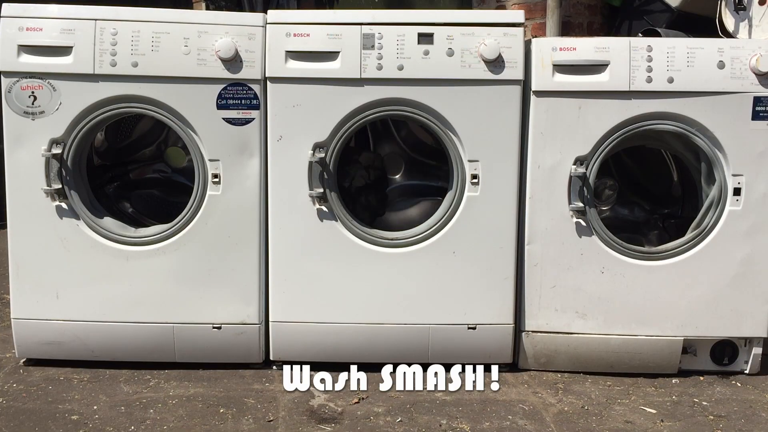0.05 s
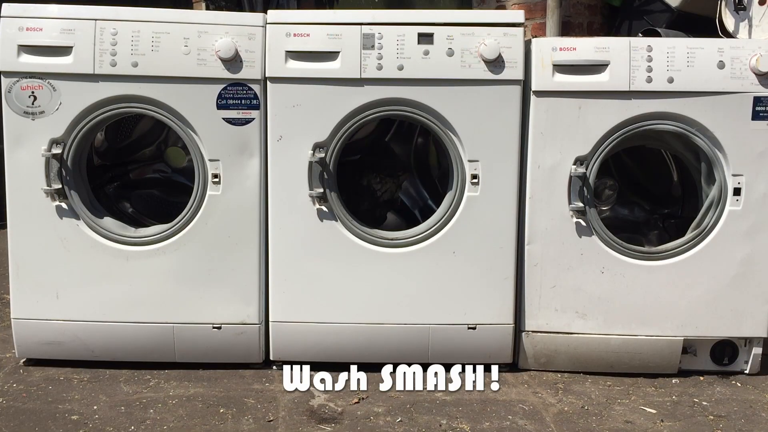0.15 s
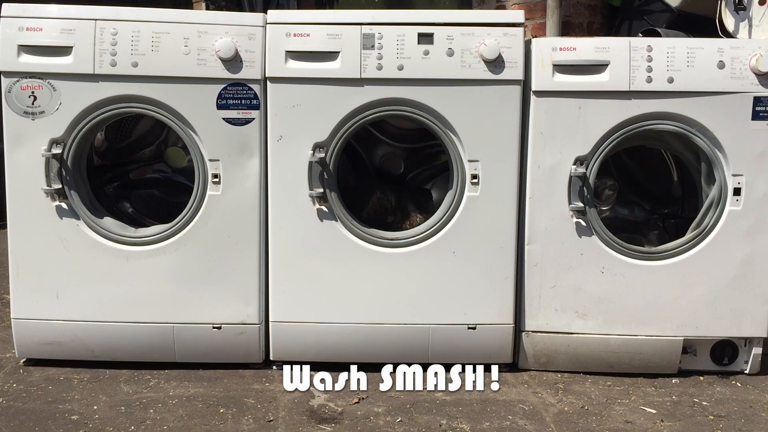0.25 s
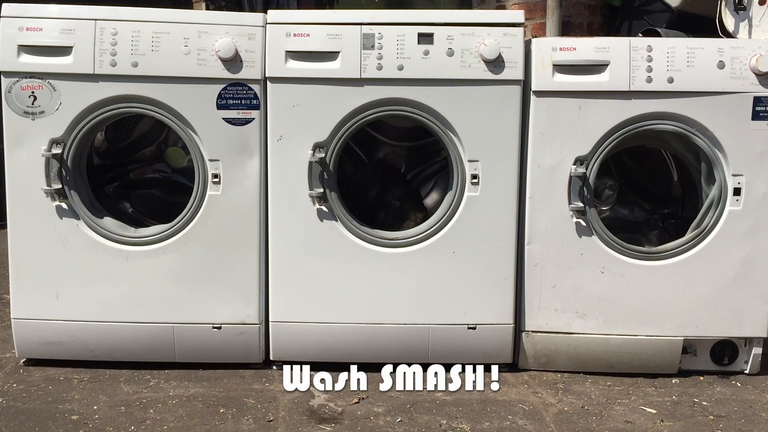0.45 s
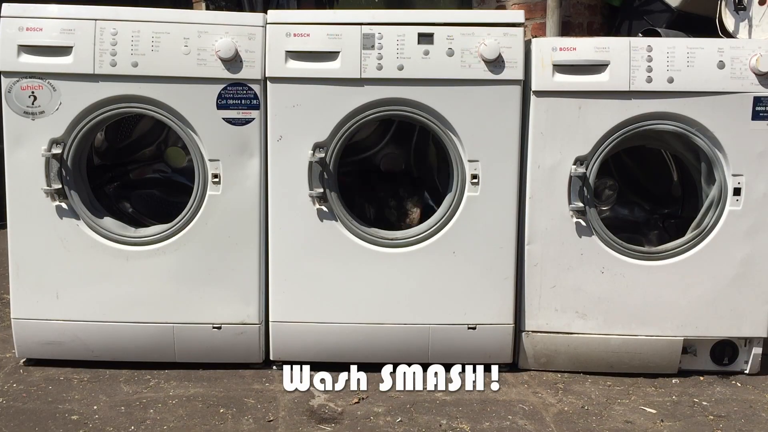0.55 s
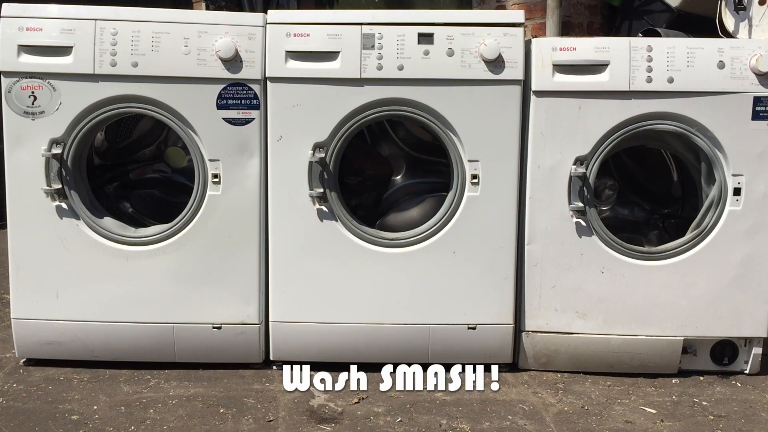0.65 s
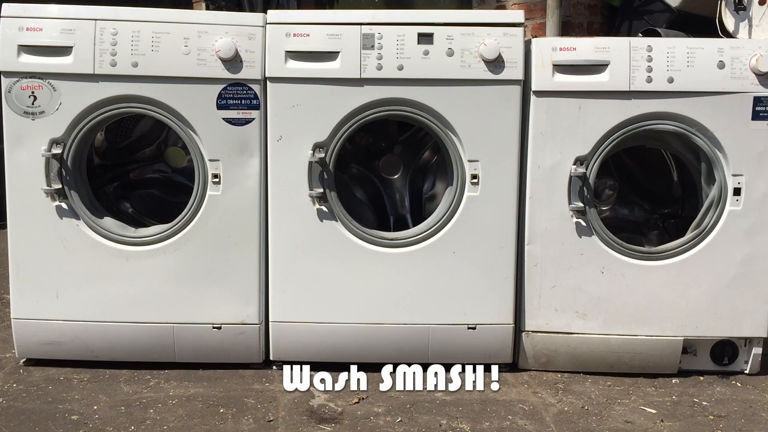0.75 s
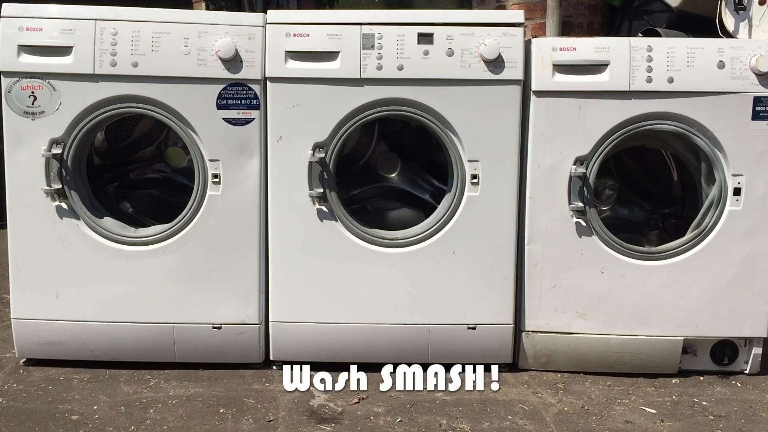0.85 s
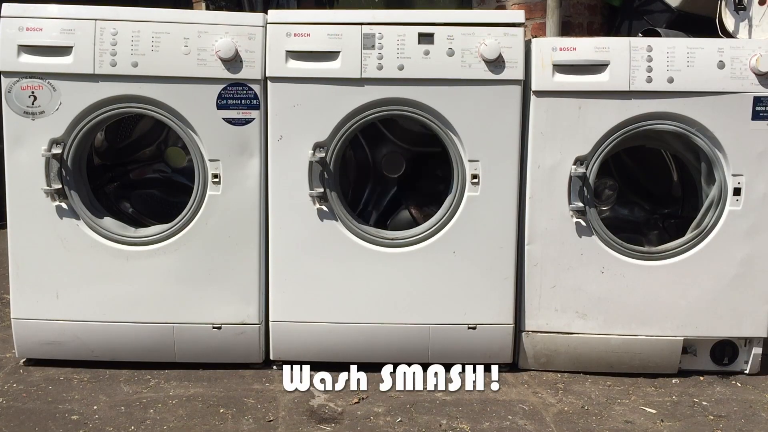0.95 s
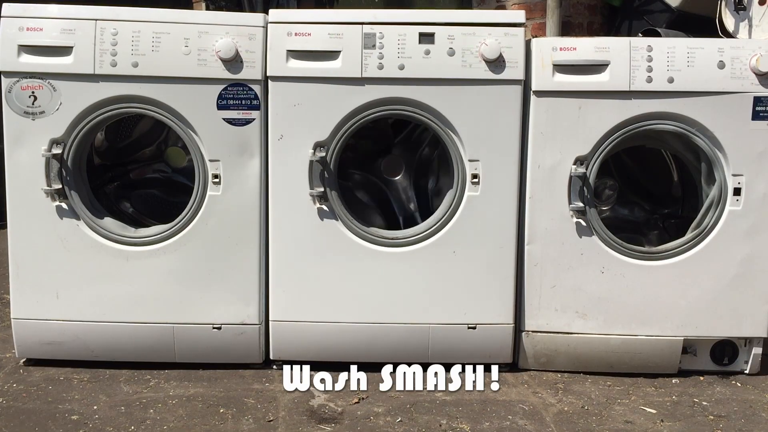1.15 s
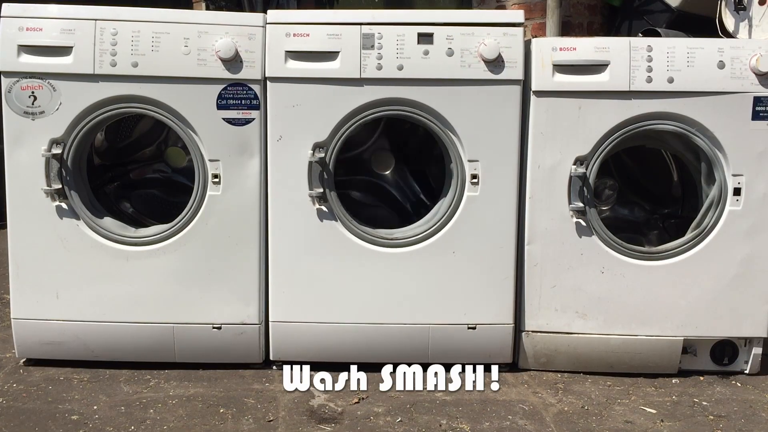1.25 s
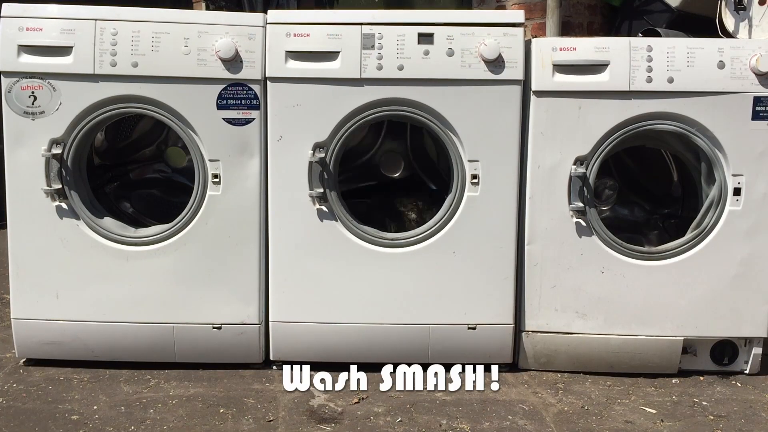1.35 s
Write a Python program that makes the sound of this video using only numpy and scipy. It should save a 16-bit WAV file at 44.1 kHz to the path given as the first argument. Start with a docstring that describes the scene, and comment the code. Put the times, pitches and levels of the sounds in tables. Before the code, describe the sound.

A washing machine drum tumbles a heavy load with thuds and metal clangs over motor hum.

```python
"""Heavy load in a washing machine

A load tumbles in the turning drum, outdoors and close by. Each blow excites damped modes:
the tub thumps, the cabinet knocks and shudders, the steel drum clangs and the contact crunches.
Underneath, the motor hums and whines and the drum rubs as it turns."""
import sys
import numpy as np
from scipy import signal
from scipy.fft import rfft, irfft, next_fast_len
from scipy.io import wavfile
from scipy.ndimage import uniform_filter1d

SR = 44100
rng = np.random.default_rng(int(sys.argv[2]) if len(sys.argv) > 2 else 0)


def dump_mix(stems):
    """Bounce the given channels to the path in sys.argv[1] as a 16-bit WAV at rate SR."""
    frames = np.atleast_2d(stems).T  # one column per channel
    limited = np.clip(frames, -1, 1)  # hard clip at full scale
    pcm = np.round(limited * 32767).astype(np.int16)
    wavfile.write(sys.argv[1], SR, pcm)


N = 61739
TIME = np.arange(N) / SR


def undb(db):
    """Amplitude ratio of a level in decibels."""
    return 10 ** (np.asarray(db) / 20)

def unit(x):
    """Normalisation to rms 1."""
    return x / np.sqrt(np.mean(x ** 2))

def response(x, blow_s=0.019):
    """Normalisation to the energy of rms 1 held for blow_s."""
    return x * np.sqrt(blow_s * SR / np.sum(x ** 2))

def at(points, hz):
    """Interpolation on a log-frequency axis."""
    f, v = np.array(points, float).T
    return np.interp(np.log(np.maximum(hz, 1)), np.log(f), v)

def colour(x, points):
    """Minimum-phase filtering by a curve of (frequency [Hz], gain [dB])."""
    size = 2 * next_fast_len(N)
    cepstrum = irfft(np.log(undb(at(points, np.fft.rfftfreq(size, 1 / SR)))))
    cepstrum[1:size // 2] *= 2
    cepstrum[size // 2 + 1:] = 0
    return irfft(rfft(x, size) * np.exp(rfft(cepstrum)))[:N]

def drift(rate_hz):
    """Smoothed random steps at rms 1."""
    hold = int(SR / rate_hz)
    steps = np.repeat(rng.standard_normal(400)[:N // hold + 1], hold)
    return unit(uniform_filter1d(uniform_filter1d(steps, hold), hold)[:N])

def fade(t60):
    """Exponential decay by 60 dB in t60 seconds."""
    return np.exp(-np.log(1000) * TIME / t60)

def modes(table):
    """Modal superposition: an impulse response is a sum of damped sinusoids."""
    return response(sum(undb(db) * fade(t60) * np.cos(2 * np.pi * hz * TIME) for hz, db, t60 in table))

def dense_ring(spectrum, t60):
    """Modal overlap: crowded resonances merge into decaying noise."""
    return response(colour(rng.standard_normal(N) * fade(t60), spectrum))

def ring(force, body):
    """Linear response: force convolved with a body's impulse response."""
    return signal.fftconvolve(force, body)[:N]

def tones(table, speed=1):
    """Frequency modulation: each tone wavers about a pitch proportional to speed."""
    out = 0
    for hz, db, waver in table:
        pitch = hz * speed * (1 + waver * drift(55))
        out = out + undb(db) * np.sqrt(2) * np.sin(2 * np.pi * np.cumsum(pitch) / SR)
    return out


# Rubbing of the drum (time [s], level [dB])
RUB_LEVEL = [(0, -61), (0.059, -56), (.09, -51), (.2, -46), (.7, -43), (1.07, -48.5), (1.19, -43),
             (1.282, -43.5), (1.4, -42)]
# Spectra of rubbing and rumble (frequency [Hz], relative level [dB])
RUB_SPECTRUM = [(60, 2), (160, 8.5), (280, 4), (420, -1.5), (600, 4.5), (1100, 3.5), (1900, -5.5),
                (2300, 1.5), (2750, -6), (3500, -1), (4800, -13), (7000, -14.5), (10000, -23), (15500, -26)]
RUMBLE_SPECTRUM = [(25, -53), (58, 10), (100, -5), (170, -4), (300, -9.5), (600, -3), (1200, -24),
                   (4000, -47)]
# Motor hum, and whine at speed 1 (frequency [Hz], level [dB], waver [fraction]); whine levels are relative
HUM_TONES = [(52, -80, 0.07), (97.6, -51.5, 0.018), (598, -61.5, 0.0025)]
WHINE_TONES = [(1141, -4, .004), (2195, 0, .004), (3480, -4, .006), (3550, -3, .006)]
def drive(rumble_db=-50, whine_db=-51):
    """Rotation gives hum, rumble and a rising whine that swells with the drum's friction noise."""
    effort = undb(np.interp(TIME, *np.array(RUB_LEVEL).T))
    rub = unit(colour(rng.standard_normal(N), RUB_SPECTRUM)) * undb(1.06 * drift(100))
    rumble = undb(rumble_db) * unit(colour(rng.standard_normal(N), RUMBLE_SPECTRUM))
    speed = 1 + 0.12 * (TIME - 1.28)
    whine = undb(whine_db) * (effort / effort.max()) ** 2 * tones(WHINE_TONES, speed)
    return effort * rub + whine + tones(HUM_TONES) + rumble


def pushes(times, levels_db, push_s=0.0017):
    """Soft impact: the load's weight gives smooth force pulses, weak in treble."""
    rise_s = push_s / np.pi
    age = np.maximum(TIME - times[:, None], 0) / rise_s
    return undb(levels_db) @ (age * np.exp(-age)) / (SR * rise_s)


# Modes of the tub and cabinet panels (frequency [Hz], relative level [dB], T60 [s])
TUB_MODES = [(86, -15, .18), (105, -4, .26), (141, 2, .33), (155, -2, .22)]
PANEL_MODES = [(188.4, -3, 0.6), (211.3, 6, 0.33), (243, 7.5, 0.11), (266.2, 6, 0.37), (278, -26, 0.21),
               (315.2, -5.5, 0.83), (342, -15.5, 0.94)]
# Shudder of the cabinet (frequency [Hz], relative level [dB])
SHUDDER_SPECTRUM = [(25, -20), (50, -4.5), (90, -22.5), (140, 11), (180, -6.5), (250, 3), (330, -7.5),
                    (420, -34), (900, -40)]
def cabinet(times, thump_db, knock_db, band_hz=(85, 343)):
    """Impacts excite resonances of tub, panels and cabinet, which radiate only in a low band."""
    thump, knock = pushes(times, thump_db), pushes(times, knock_db)
    tub = undb(-4) * ring(thump, modes(TUB_MODES))
    panels = undb(-1.5) * ring(knock, modes(PANEL_MODES))
    shudder = undb(-10.5) * ring(thump + knock, dense_ring(SHUDDER_SPECTRUM, t60=0.26))
    radiation = signal.butter(4, band_hz, "band", fs=SR, output="sos")
    return signal.sosfilt(radiation, tub + panels + shudder)


def contacts(times, levels_db, decay_s, first=0, per_s=1800):
    """Shot noise: a blow is a fading chatter of small contacts, led by an impulse of size first."""
    size = 4000
    force, envelope = np.zeros(N + size), np.exp(-TIME[:size] / decay_s)
    for onset, db in zip(times, levels_db):
        burst = rng.standard_normal(size) * (rng.random(size) < per_s / SR) * envelope
        burst[0] += first
        i = int(onset * SR)
        force[i:i + size] += undb(db) * burst / np.linalg.norm(burst)
    return force[:N]


# Ring of the sheet metal (frequency [Hz], relative level [dB])
SHEET_SPECTRUM = [(150, -22), (300, -6.5), (420, -14), (680, -6), (950, 5.5), (1250, -4.5), (1900, -14),
                  (2550, -11), (3400, -16), (5000, -28.5), (9000, -35), (15000, -65)]
# Its decay (frequency [Hz], T60 [s])
SHEET_T60 = [(200, 0.82), (950, 0.58), (2000, 0.43), (4000, 0.45), (10000, 0.057)]
def sheet_metal():
    """Frequency-dependent damping: after an early crack, the highest of the dense modes die first."""
    noise, hz = rfft(rng.standard_normal(N)), np.fft.rfftfreq(N, 1 / SR)
    octaves = 125 * 2. ** np.arange(8)
    tail = 0
    for centre in octaves:
        band = at(list(zip(octaves, octaves == centre)), hz)
        tail = tail + irfft(noise * band, N) * fade(at(SHEET_T60, centre))
    crack = 1 + undb(4) * fade(t60=0.08)
    return response(colour(tail * crack, SHEET_SPECTRUM))


# Strongest modes of the steel drum (frequency [Hz], relative level [dB], T60 [s])
DRUM_MODES = [(532, -6, .6), (711, -4, .6), (827, -2, .5), (911, 0, .8), (991, -1, .7), (1035, -2, .7),
              (1191, -7, .4), (1377, -5, .35), (1504, -8, .35), (1754, -9, .3), (2602, -5, .3)]
def drum_clang(times, clang_db, bright_db, chatter_s=0.004, first=2.19):
    """Impact excitation at one spot: harder contacts bring out the drum's upper modes."""
    body = undb(-8.5) * modes(DRUM_MODES) + undb(-0.5) * sheet_metal()
    soft = contacts(times, clang_db, chatter_s, first)
    hard = contacts(times, clang_db + bright_db, chatter_s, first)
    low = colour(soft, [(1200, -3.5), (2400, -44)])
    high = colour(hard, [(1000, -9.5), (2100, 0.5), (2700, -5), (3600, -10.5)])
    return ring(low + high, body)


# Spectra of the grinding contact and its snap (frequency [Hz], relative level [dB])
GRIND_SPECTRUM = [(800, -21), (2000, 4), (3500, 10.5), (6200, 2), (8500, -13), (11000, -37), (15500, -43)]
SNAP_SPECTRUM = [(4000, -28), (7000, 1), (9000, 6.5), (11000, 0), (15500, -4.5)]
def crunch(times, crunch_db, sharp_db, crumble_s=0.0067):
    """Contact noise: the load grinds briefly on the steel, and sharp edges add a snap."""
    grind = ring(contacts(times, crunch_db, crumble_s), dense_ring(GRIND_SPECTRUM, t60=0.18))
    edges = contacts(times, crunch_db + sharp_db - 13.5, crumble_s)
    return grind + ring(edges, dense_ring(SNAP_SPECTRUM, t60=0.11))


# Blows of the load, in relative levels (time [s], tub thump [dB], panel knock [dB], drum clang [dB],
# clang brightness [dB], crunch [dB], crunch sharpness [dB])
BLOWS = [(0.182, -30, -36, -37.5, -5, -54, 5), (0.2096, -26.5, -49, -12, 0, -51, 3),
         (0.22, -4, -10, -13.5, 0, -31, -3), (0.242, -11.5, -28, -13, 4.5, -34, 3),
         (.271, -24, -15, -12.5, -4, -39, -16), (.334, -32, -16.5, -27.5, -1, -63, -10),
         (.384, -40, -12, -17.5, -2, -44, -1), (.417, -10.5, -16.5, -13.5, -2, -34, -1),
         (.436, -13, -23, -8.5, 6.5, -34, -2), (.462, -23, -33, -11, 4, -26, -0.5),
         (.486, -12, -10, -9, -2, -34, -13), (.505, -24, -20, -16.5, 5, -58, -8),
         (0.536, -11.5, -18, -15.5, -1, -40.5, 3), (0.572, -25, -40, -17.5, -7, -46, -15),
         (0.601, -21.5, -19.5, -24, 5, -40.5, -15), (.634, -11.5, -15.5, -17.5, -6.5, -53, -6),
         (.651, -15, -21.5, -35.5, 11.5, -41, -3), (0.684, -14.5, -34, -28, 6, -57, -6),
         (.706, -16, -16, -22, 0, -40.5, 6.5), (0.729, -33, -12.5, -15.5, -4.5, -55, 3),
         (0.7526, -11, -4.5, -7, 5, -23, 3), (.765, -7, -4.5, -12.5, 4.5, -25, -7),
         (.784, -10, -14.5, -10.5, 1, -32, 2.5), (0.81, -9, -6.5, -16, 12, -23, 0),
         (.823, -16.5, -15.5, -10, -0.5, -53, 9), (.850, -20, -23.5, -30, 9.5, -41.5, 1),
         (.890, -48, -16, -28.5, -11, -46, -1), (0.956, -20.5, -26.5, -38.5, 13, -69, -6),
         (1.003, -36, -49, -25.5, -3.5, -69, -6), (1.070, -28, -30, -43, 4.5, -62, -3),
         (1.314, -31.5, -32.5, -39, 1.5, -51, 4), (1.350, -41, -29.5, -42, -23, -53.5, 7),
         (1.371, -44, -34, -70, -21, -53, 6)]
def tumbling_load(spots=3):
    """Response depends on the point of impact: blows visit spots in turn, each with its own ring."""
    blows = np.array(BLOWS, float)
    times, thump_db, knock_db, *_ = blows.T
    out = cabinet(times, thump_db, knock_db)
    for spot in range(spots):
        times, _, _, clang_db, bright_db, crunch_db, sharp_db = blows[spot::spots].T
        out += drum_clang(times, clang_db, bright_db) + crunch(times, crunch_db, sharp_db)
    return out

def scene():
    """Superposition of the blows and the running machine, in mono."""
    return (tumbling_load() + drive())[None]

def record(dry, overload=1.2, top_hz=15800):
    """Soft saturation rounds the loudest peaks; a low-pass filter cuts the top."""
    lowpass = signal.ellip(8, .2, 80, top_hz, fs=SR, output="sos")
    return signal.sosfilt(lowpass, np.tanh(overload * dry) / overload)


dry = scene()
out = record(dry)
dump_mix(out)
```